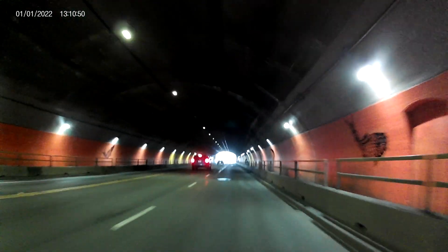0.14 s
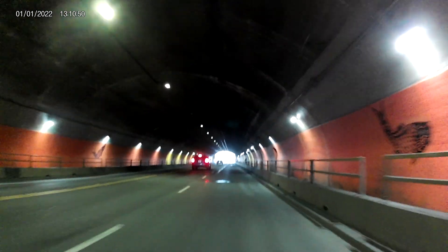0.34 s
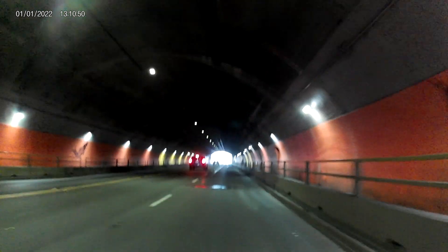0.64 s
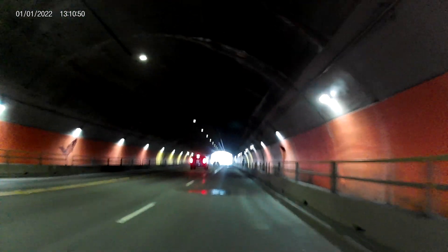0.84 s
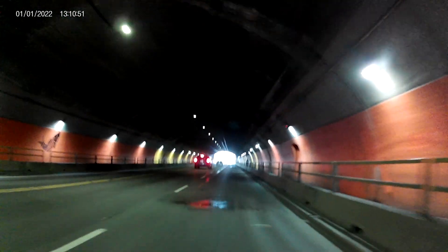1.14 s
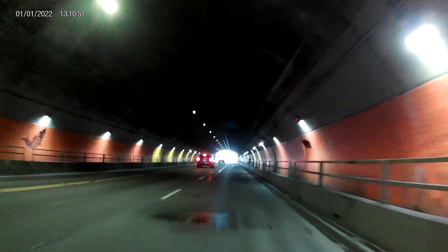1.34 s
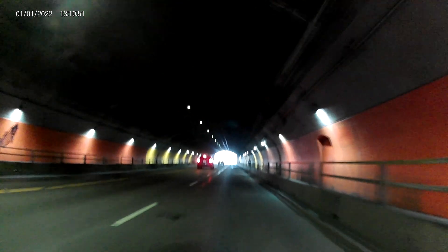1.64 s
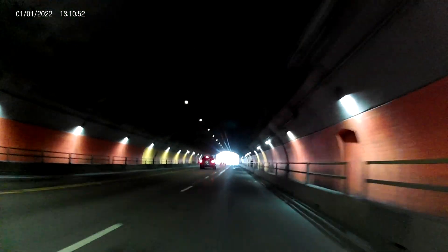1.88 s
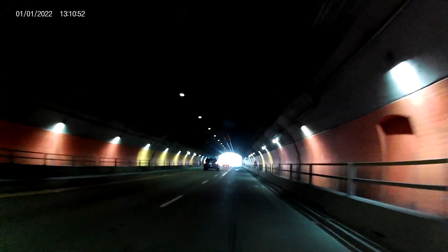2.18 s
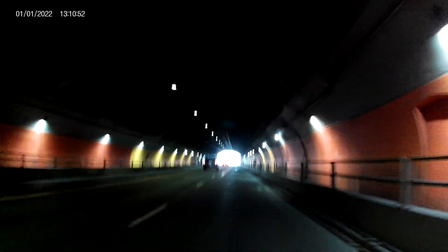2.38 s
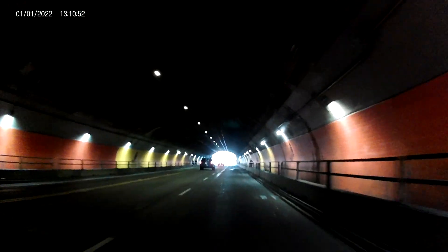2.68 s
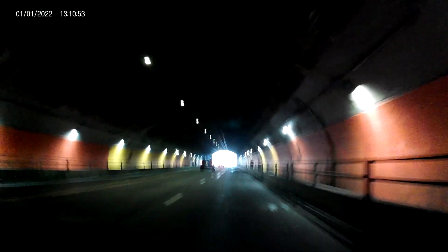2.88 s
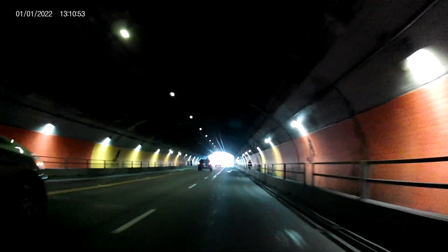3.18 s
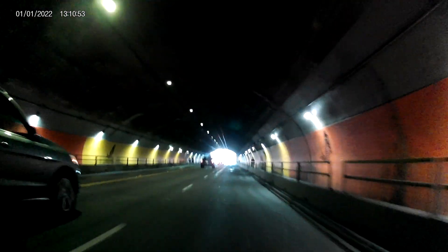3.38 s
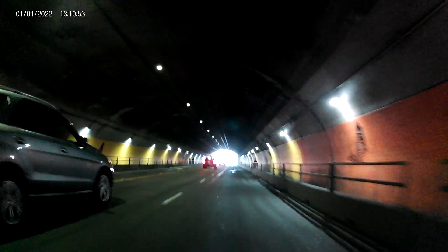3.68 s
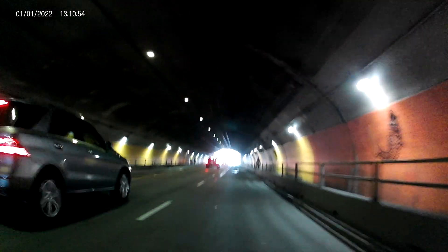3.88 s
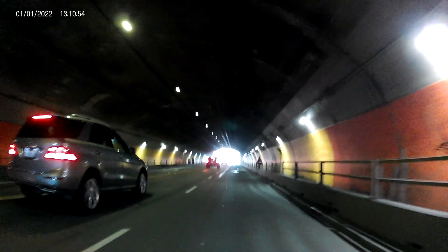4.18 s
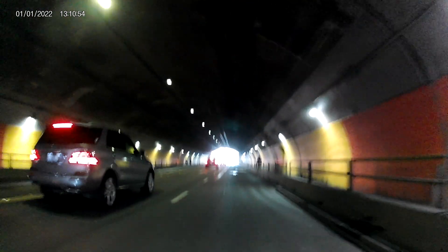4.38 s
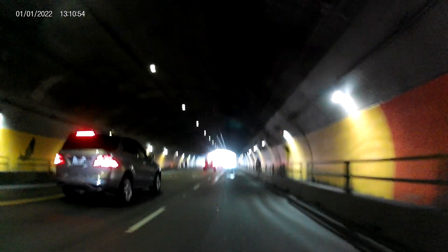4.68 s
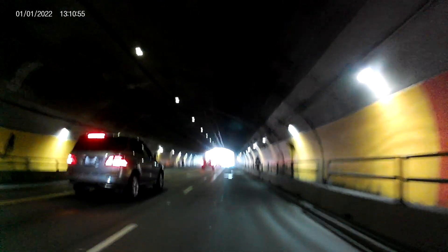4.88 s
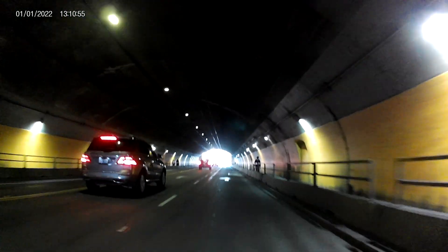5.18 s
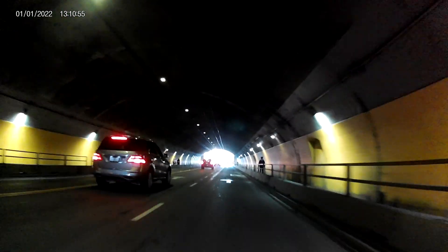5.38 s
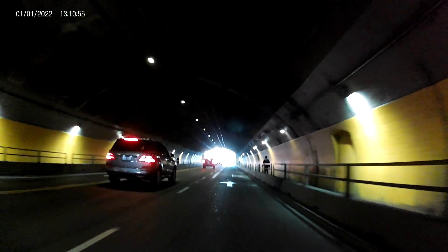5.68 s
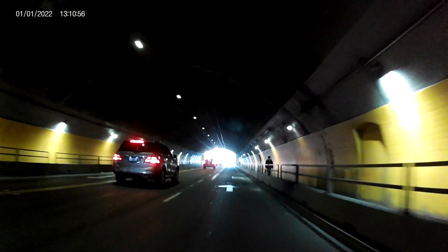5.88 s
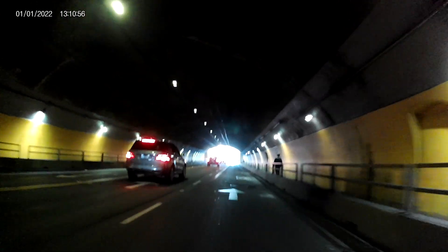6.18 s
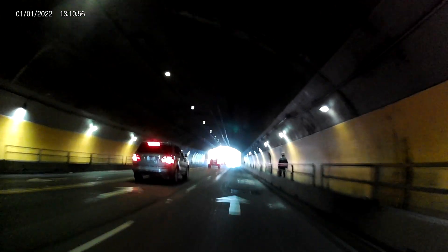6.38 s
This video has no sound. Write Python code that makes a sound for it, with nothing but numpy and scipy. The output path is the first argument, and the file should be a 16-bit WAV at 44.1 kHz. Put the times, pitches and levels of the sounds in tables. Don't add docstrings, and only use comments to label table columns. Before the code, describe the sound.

A continuous, dark roar of tyres and engines blurs together inside a long road tunnel, with wind buffeting the small camera on a bicycle. Road bumps give deep, soft thumps through the mount. Right beside the microphone a loose plastic part rattles in irregular flurries of short, dry, bright ticks, some standing out sharply. The level hardly changes as a car overtakes; treble is thin and grainy.

```python
import sys
import numpy as np
from scipy import signal
from scipy.fft import rfft, irfft
from scipy.io import wavfile
from scipy.ndimage import uniform_filter1d

SR = 44100
rng = np.random.default_rng(int(sys.argv[2]) if len(sys.argv) > 2 else 0)


def to_wav(s):
    ch = np.atleast_2d(s).T
    pcm = np.round(np.clip(ch, -1, 1) * 32767)
    wavfile.write(sys.argv[1], SR, pcm.astype(np.int16))


def elevation(decibels):
    levels = np.asarray(decibels, float)
    return 10 ** (levels / 20)


N = 288414

# (frequency [Hz], density [dB per Hz])
ROAR_COLOUR = [(10, -26), (22, -5), (70, -5.5), (110, -3), (206, -2), (361, -6.5), (414, -6.5), (543, -9.5),
               (900, -8.5), (1700, -19.5), (2200, -30), (3300, -39), (4200, -42.5), (5600, -54.5)]
# (time [s], level [dB])
TRAFFIC_LOUDNESS = [(0.0, -18), (0.07, -19.5), (0.98, -17), (1.05, -17), (1.49, -17), (2.48, -18),
                    (2.64, -17), (3.17, -18), (3.19, -17.5), (3.52, -18), (3.55, -13.5), (3.57, -18),
                    (4.99, -17.5), (5.26, -16.5), (5.32, -18.5), (5.46, -18), (6.54, -18)]
# (time [s], length [s])
LOUD_MOMENTS = [(.026, 0), (.328, 0), (.538, .021), (.722, 0), (.931, 0), (1.326, 0), (1.372, .024),
                (1.581, 0), (1.721, 0), (2.139, .023), (2.278, 0), (2.51, .023), (2.766, 0), (2.927, .024),
                (3.16, .047), (3.253, 0), (3.346, 0), (3.532, .023), (3.88, 0), (3.996, .024), (4.111, 0),
                (4.205, 0), (4.414, 0), (4.6, .046), (4.879, 0), (4.972, 0), (5.598, .025), (5.877, .022),
                (6.086, .023), (6.203, 0)]
# (middle time [s], peak level [dB], length [s])
ROAD_BUMPS = [(0.058, -20.5, 0.17), (0.21, -28, 0.063), (0.36, -25, 0.07), (0.623, -19.5, 0.23),
              (0.838, -25, 0.15), (1.117, -36, 0.07), (1.238, -28, 0.08), (1.356, -23, 0.07),
              (1.5423, -19.5, 0.13), (1.787, -27, 0.13), (2.1008, -21, 0.07), (2.3, -22, 0.065),
              (2.5203, -17.5, 0.084), (2.8115, -29, 0.07), (2.968, -29, 0.07), (3.167, -19, 0.076),
              (3.2943, -25, 0.077), (3.431, -28, 0.16), (3.628, -26, 0.16), (3.952, -20.5, 0.12),
              (4.18, -25, 0.12), (4.402, -16.5, 0.24), (4.773, -23, 0.12), (4.904, -21, 0.16),
              (5.272, -29, 0.07), (5.516, -23, 0.07), (5.8148, -24, 0.07), (6.099, -26, 0.12),
              (6.419, -22, 0.25)]
# (time [s], peak level [dB], upper rings re main ring [dB])
HARD_KNOCKS = [(0.0043, -23, -8), (0.4015, -24.5, -10), (0.5556, -17.5, -10.5), (0.619, -23.5, -18),
               (0.7933, -18.5, -9), (1.0884, -26, -18), (1.4105, -23, -14), (1.4768, -22.5, -14),
               (1.5414, -21.5, -26), (1.7627, -23.5, -12), (2.0478, -21.5, -15), (2.1096, -23, -33),
               (2.4791, -19.5, -9.5), (3.0905, -24, -7), (3.3388, -19.5, -8.5), (3.5604, -23, -13),
               (3.6764, -19, -10.5), (3.7454, -23, -25), (3.9084, -23, -14), (3.9956, -25, -15),
               (4.3574, -22, -14), (4.434, -23, -12), (4.6862, -20, -9.5), (5.0095, -24, -20),
               (5.1537, -23.5, -16), (5.2738, -25, -23), (5.7284, -25, -33), (6.2456, -17, -16),
               (6.2955, -24, -13), (6.4997, -24.5, -29)]
# (time [s], peak level [dB])
FIRM_KNOCKS = [(0.0269, -27), (0.1029, -26.5), (0.5845, -33), (0.6282, -28), (0.7034, -31), (1.1251, -28),
               (1.5301, -27), (1.5742, -28), (2.4635, -29), (2.5415, -27.0), (3.301, -27.0),
               (3.4073, -26.5), (3.6617, -31), (3.8783, -24.5), (4.2999, -25), (4.3145, -28), (4.3681, -29),
               (4.392, -34), (4.412, -31), (4.4564, -29), (4.7127, -29), (4.7334, -29), (4.765, -28),
               (4.8816, -25.5), (4.976, -26.5), (5.0999, -26), (5.528, -26.5), (5.9476, -26),
               (6.0296, -26.5), (6.3351, -26.5)]
# (time [s], peak level [dB])
LONE_KNOCKS = [(0.4295, -33), (0.8232, -33), (0.8586, -35), (0.8761, -30), (0.9353, -27), (1.1957, -32),
               (1.619, -33.5), (1.6524, -35), (1.8039, -35), (1.8174, -33), (1.8635, -31), (2.078, -35),
               (2.1441, -34), (2.3235, -30), (2.3542, -35), (2.7273, -31.5), (2.8599, -32), (3.149, -30),
               (3.5465, -39), (3.8933, -35), (4.062, -32), (4.105, -32), (4.485, -38), (4.5664, -33),
               (4.6211, -32), (4.848, -33), (5.2564, -32), (5.8708, -35), (6.159, -34), (6.4072, -30)]
# (start time [s], end time [s], knocks [count], level [dB])
RATTLE_SPELLS = [(0.0043, 0.124, 12, -30), (0.15, 0.211, 8, -31), (0.4896, 0.7553, 26, -28),
                 (0.77, 0.795, 3, -30), (1.0884, 1.3396, 23, -31.5), (1.409, 1.5742, 16, -33),
                 (1.997, 2.046, 5, -30), (2.113, 2.151, 4, -32), (2.415, 2.487, 8, -25),
                 (2.498, 2.6103, 11, -29), (2.9115, 3.1244, 20, -31.5), (3.516, 3.582, 7, -28.5),
                 (3.674, 3.807, 12, -32.5), (3.8496, 3.8879, 5, -31), (3.91, 3.997, 8, -30),
                 (4.1245, 4.2276, 9, -28), (4.2999, 4.324, 3, -26), (4.334, 4.5353, 19, -24),
                 (4.7127, 4.767, 6, -25), (4.9302, 5.006, 8, -30.5), (5.02, 5.0928, 8, -32),
                 (5.097, 5.233, 12, -30.5), (5.3967, 5.432, 4, -28), (5.529, 5.551, 3, -31),
                 (5.637, 5.726, 10, -31), (5.8871, 6.0103, 11, -26), (6.0285, 6.185, 15, -32),
                 (6.235, 6.318, 8, -33), (6.336, 6.3997, 6, -31.5), (6.484, 6.514, 4, -33.5)]
# (frequency [Hz], width [Hz], level [dB])
UPPER_RINGS = [(4430, 280, 7.5), (5280, 1000, -2.5), (6850, 930, -4)]
# (frequency [Hz], density [dB per Hz])
HISS_COLOUR = [(100, -4.5), (5000, 4), (6500, 3), (7000, -1), (7800, -1), (8100, 2.5), (15600, -0.5)]
# (frequency [Hz], gain [dB])
CAMERA_COLOUR = [(100, 0), (5550, -1), (5900, -10), (7300, -13), (7900, -45)]
# (frequency [Hz], level [dB])
DROP_LEVEL = [(2000, -16), (3200, -3), (3900, -11), (4400, -0.5), (5500, -1), (7800, -4), (8300, -5),
              (15000, -5.5)]
# (frequency [Hz], share [ratio])
LOST_SHARE = [(1500, 0.13), (3000, 0.69), (4500, 0.51), (6000, 1.16), (15000, 0.73)]


def evened(x):
    return x / np.sqrt(np.mean(x ** 2) + 1e-20)


def read(points, hz):
    f, value = np.transpose(points)
    return np.interp(np.log(hz + 1), np.log(f + 1), value)


def loud_moments(width):
    t = np.arange(0, N, 32) / SR
    plateaus = 0
    for start, length in LOUD_MOMENTS:
        outside = t - np.clip(t, start, start + length)
        plateaus = plateaus + np.exp(-(outside / width) ** 4)
    return np.interp(np.arange(N) / SR, t, np.minimum(plateaus, 1))


def tunnel_roar():
    frames, hz = N // 256 + 5, np.fft.rfftfreq(1024, 1 / SR)
    real, imag, patches = rng.standard_normal((frames, 513, 3)).T
    patches = uniform_filter1d(patches, size=8, axis=0)
    patches = evened(uniform_filter1d(patches, size=12, axis=1))
    times, levels = np.transpose(TRAFFIC_LOUDNESS)
    loud_db = np.interp(np.arange(frames) * 256 / SR, times, levels)
    swing = loud_db - loud_db.mean()
    rumble, tyres, tyre_hiss = 1.6 * swing, 0.68 * swing, 0.78 * swing
    to_tyres = np.clip(np.log2(hz[:, None] / 250 + 1e-9), 0, 1)
    to_hiss = np.clip(np.log2(hz[:, None] / 1300 + 1e-9) * 1.5, 0, 1)
    swell_db = rumble + to_tyres * (tyres - rumble) + to_hiss * (tyre_hiss - tyres)
    level_db = read(ROAR_COLOUR, hz)[:, None] + swell_db + 0.79 * patches
    spectrum = (real + 1j * imag) * elevation(level_db)
    noise = evened(signal.istft(spectrum, nperseg=1024, noverlap=768)[1][:N])
    return elevation(-16.5 + 0.53 * loud_moments(0.012)) * noise


def mount_shake():
    shake_hz, phase, edge_db, rest_db = 46.3, -1.2, -4.5, -30
    motion, power = np.zeros(N + SR), np.zeros(N + SR)
    dt = np.arange(SR) / SR - .5
    rocking = np.cos(2 * np.pi * shake_hz * dt + phase)
    for s, db, length in ROAD_BUMPS:
        swing = elevation(db + edge_db * (2 * dt / length) ** 2)
        at = round(s * SR)
        motion[at:at + SR] += (swing * rocking)[:N + SR - at]
        power[at:at + SR] += (swing ** 2)[:N + SR - at]
    motion, power = motion[SR // 2:][:N], power[SR // 2:][:N]
    return motion, 10 * np.log10(power + elevation(rest_db) ** 2)


def light_knocks(listed_s):
    start, end, knocks, db = np.transpose(RATTLE_SPELLS)[:, :, None]
    k, last = np.arange(30), np.round(knocks) - 1
    late, weak, colour = rng.standard_normal((len(RATTLE_SPELLS), len(k), 3)).transpose(2, 0, 1)
    inside = (k > 0) & (k < last)
    at = (start + (end - start) * k / last + inside * .0008 * late).ravel()
    level = (db - 8.5 * abs(weak)).ravel()
    upper_db = -14.5 + 3.5 * colour.ravel()
    clear = abs(at[:, None] - listed_s).min(axis=1) > .005
    free = (k <= last).ravel() & clear
    return np.column_stack([np.clip(at, 0, N / SR - .01), np.where(free, level, -120), upper_db])


def resonate(x, hz, width):
    turn = np.exp(2j * np.pi * np.cumsum(hz * np.ones(len(x))) / SR)
    r = np.exp(-np.pi * width / SR)
    return 2 * (turn * signal.lfilter([1 - r], [1, -r], x / turn + 1e-18)).real


def twice(x, hz, width):
    return resonate(resonate(x, hz, width), hz, width)


def housing_ring(knocks, bright):
    wander = uniform_filter1d(rng.standard_normal(N), size=300)
    wander = evened(uniform_filter1d(wander, size=300))
    hz = 4008 + 35 * wander
    main = 1.184 * resonate(twice(knocks, hz, 475), hz, 900)
    tap = elevation(-9.5) * twice(knocks, 2090, 760)
    upper = 0
    for k, (f, width, db) in enumerate(UPPER_RINGS):
        upper = upper + (-1) ** (k + 1) * elevation(db) * twice(bright, f, width)
    high_pass = signal.butter(4, 4200, "high", fs=SR, output="sos")
    return main + tap + signal.sosfilt(high_pass, upper)


def loose_part(shake_db):
    listed = [HARD_KNOCKS]
    for rows in (FIRM_KNOCKS, LONE_KNOCKS):
        listed.append(np.column_stack([rows, np.full(len(rows), -16)]))
    listed = np.vstack(listed)
    s, db, upper_db = np.vstack([listed, light_knocks(listed[:, 0])]).T
    sign, lag, rebound = rng.random((len(s), 3)).T
    at = np.maximum(s - .001, 0)
    again = np.minimum(at + 0.0023 + 0.00095 * lag, (N - 1) / SR)
    blow = elevation(db + 35.0) * np.sign(sign - .5)
    chatter = elevation(2.3 * np.minimum(rng.exponential(1, N), 3.5))
    chatter = chatter * (rng.random(N) < 150 / SR)
    chatter_db = -35 + 0.23 * (shake_db + 19)
    knocks = elevation(chatter_db) * evened(chatter) * rng.choice([-1., 1.], N)
    bright = elevation(-20.0) * knocks
    for train, gain in ((knocks, blow), (bright, blow * elevation(upper_db - 2.5))):
        np.add.at(train, (at * SR).astype(int), gain)
        np.add.at(train, (again * SR).astype(int), gain * 0.82 * (rebound - .5))
    return housing_ring(knocks, bright)


def rounding_hiss():
    white = rfft(rng.standard_normal(N))
    coloured = irfft(white * elevation(read(HISS_COLOUR, np.fft.rfftfreq(N, 1 / SR))), N)
    return elevation(-61.5 + 6 * loud_moments(.009)) * evened(coloured)


def camera_sound_path(x, hiss):
    hz, t, (z, floor) = signal.stft([x, hiss], SR, "cosine", nperseg=2048, noverlap=1024)
    z = z * elevation(read(CAMERA_COLOUR, hz))[:, None] + floor
    band = np.arange(len(hz)) // 8
    power = np.add.reduceat(abs(z) ** 2, np.arange(0, len(hz), 8)) / 8
    band_rms = np.sqrt(power)[band]
    luck = rng.standard_normal(power.shape)
    real, imag = rng.standard_normal((2, *z.shape))
    held = np.arange(len(t)) // 3 * 3
    usual = np.median(power, axis=1, keepdims=True)
    rise_db = 10 * np.log10(uniform_filter1d(power, size=5, axis=1) / usual)
    heard = .35 * rise_db + 3.0 * luck[:, held] > read(DROP_LEVEL, hz[::8, None])
    kept = np.where(heard, 1, elevation(-27.5))
    z = z + elevation(-17.0) * band_rms * (real + 1j * imag)
    strong = abs(z) > read(LOST_SHARE, hz[:, None]) * band_rms
    z = z * kept[band] * strong
    return signal.istft(z, SR, "cosine", nperseg=2048, noverlap=1024)[1][:N]


def scene():
    shake, shake_db = mount_shake()
    return (tunnel_roar() + shake + loose_part(shake_db))[None]


def roll_off(x):
    return signal.sosfilt(signal.butter(12, 15720, fs=SR, output="sos"), x)


def record(dry):
    mix = camera_sound_path(dry[0], rounding_hiss())[None]
    return roll_off(mix)


dry = scene()
out = record(dry)
to_wav(out)
```